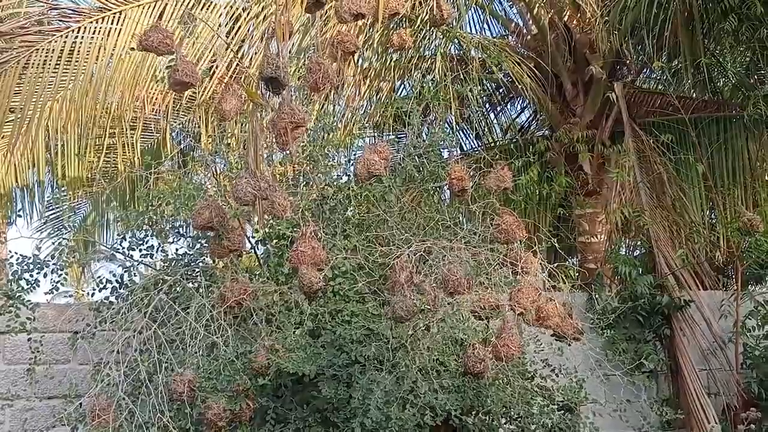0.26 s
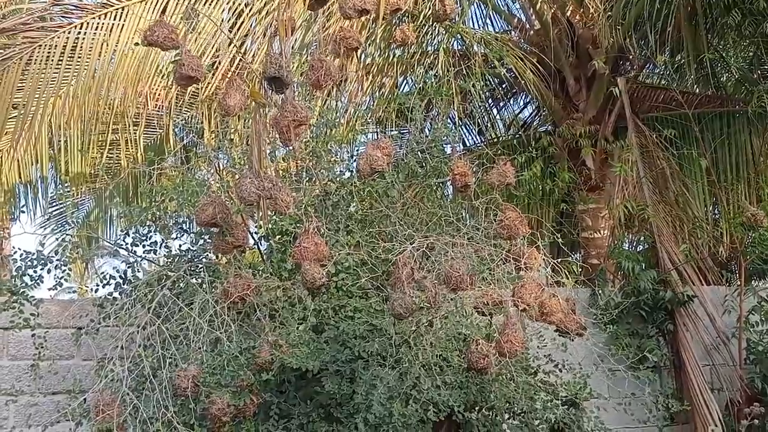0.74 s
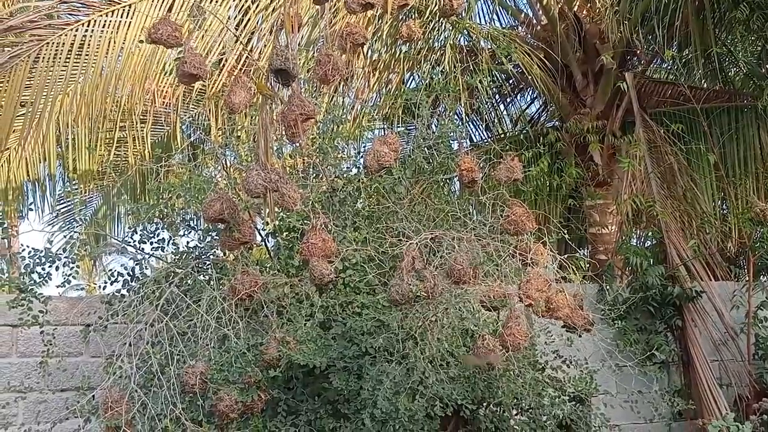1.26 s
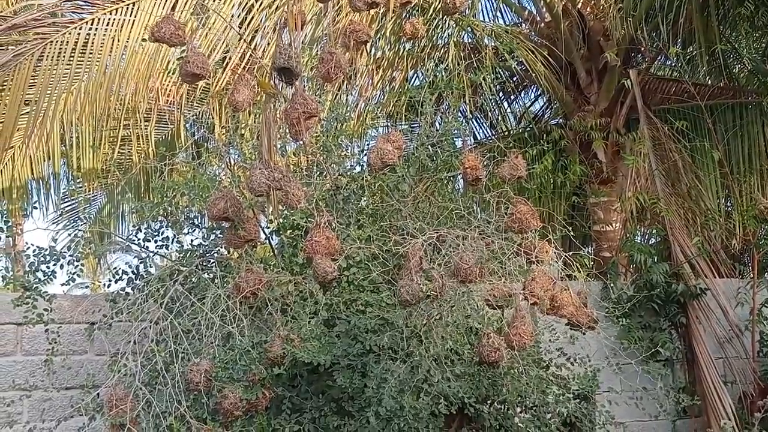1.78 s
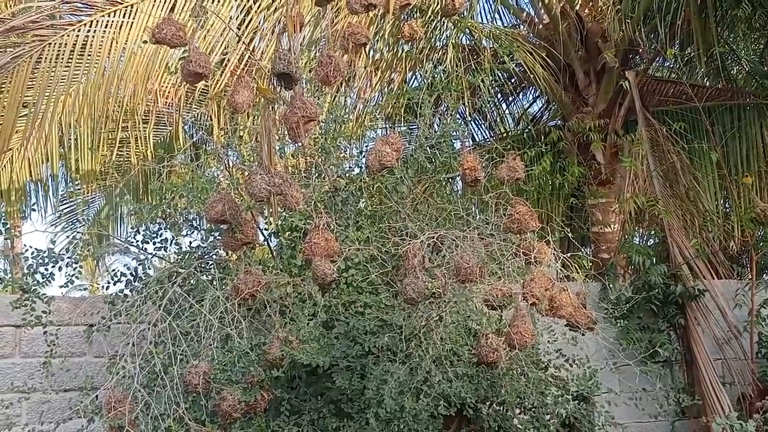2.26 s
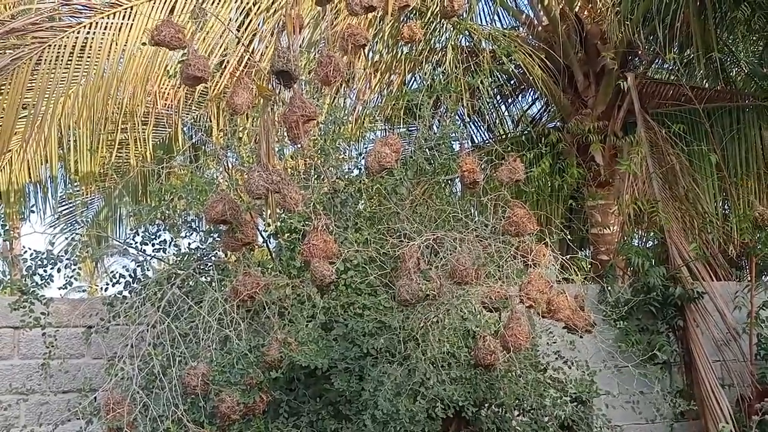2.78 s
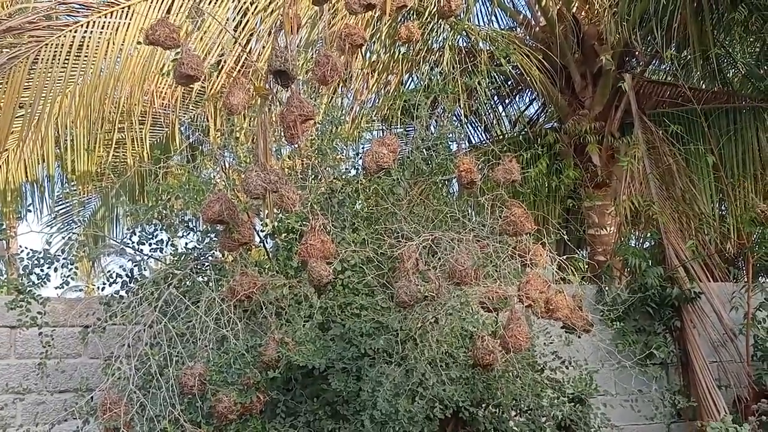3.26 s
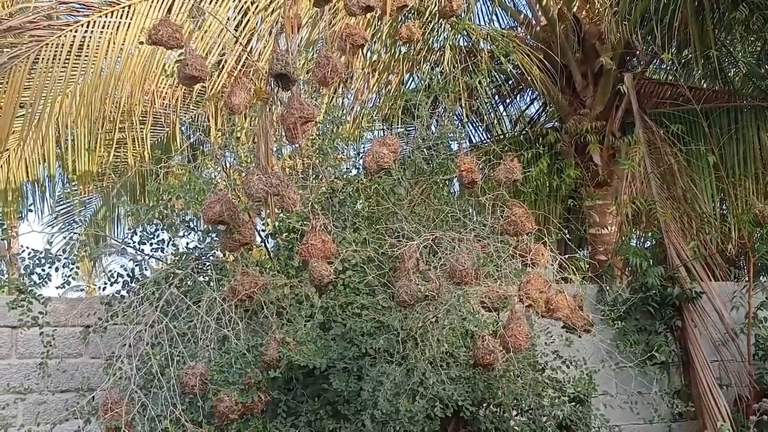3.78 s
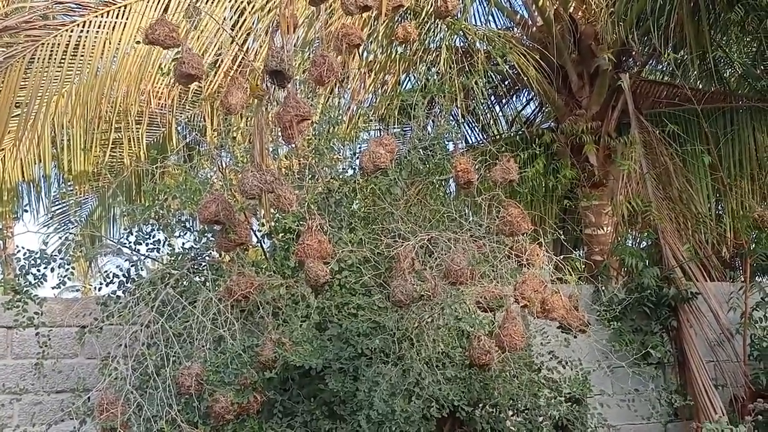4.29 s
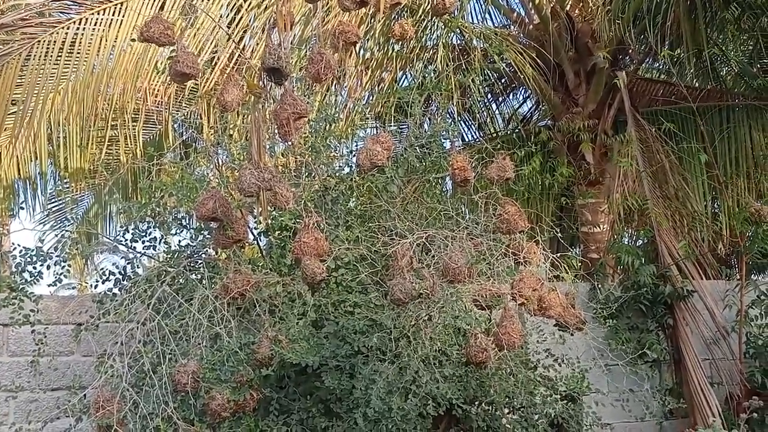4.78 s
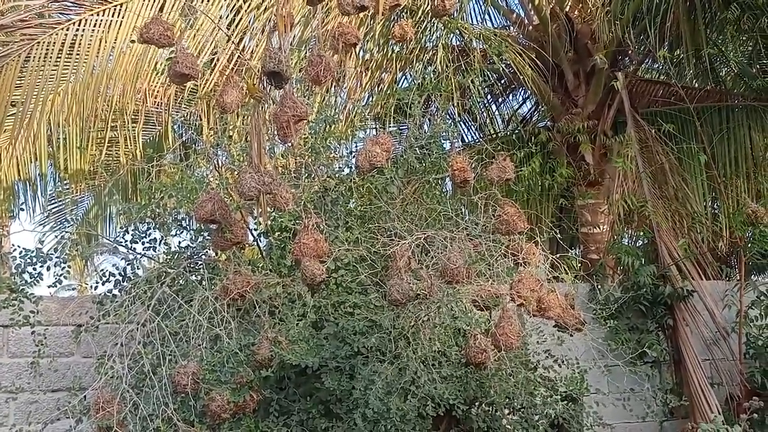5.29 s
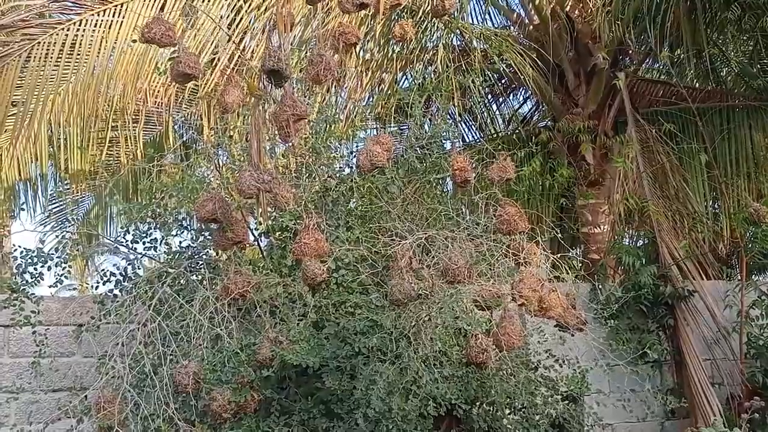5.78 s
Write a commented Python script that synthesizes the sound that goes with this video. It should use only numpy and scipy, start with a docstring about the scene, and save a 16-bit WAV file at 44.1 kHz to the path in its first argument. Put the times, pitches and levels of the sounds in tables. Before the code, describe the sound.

A colony of weaver birds in a garden tree, heard by a single outdoor microphone, identical in both channels. A dove coos softly at first among thin peeps and nasal squeals; then comes an even, rapid, harsh chatter while the distant colony swells. Piercing descending chirps, long grainy wheezes and clustered buzzes follow. Crisp clicks gather into a quick series near the end, closing with tiny upward chirps and a coarse buzz. Soft leaf hiss and low traffic hum remain underneath.

```python
"""Leaf hiss over a distant traffic hum is heard first, with a faint buzz; then a colony of weavers calls in a tree.
The hum, the hiss and the far colony are filtered noise; a dove coos and a mewing call arches once, as gliding tones.
Tongue clicks are decaying noise, whistles are gliding tones, and squeals are syrinx overtones weighted by the throat.
Buzzes and wheezes are noisy bands gated by syrinx pulses; a run of chatter is made of short hoarse overtone bursts.
Leaves and a wall add a short diffuse tail to the birds."""
import sys
import numpy as np
from scipy import signal
from scipy.fft import rfft, irfft
from scipy.io import wavfile
from scipy.ndimage import uniform_filter1d

SR = 44100
rng = np.random.default_rng(int(sys.argv[2]) if len(sys.argv) > 2 else 0)


def pcm_store(signal):
    """Save signal as 16-bit PCM."""
    levels = np.round(np.clip(np.atleast_2d(signal), -1, 1) * 32767)
    wavfile.write(sys.argv[1], SR, levels.astype(np.int16).T)


def invert_db(x):
    """Field ratio 10**(x/20) for x, a level in decibels (scalar or array-like)."""
    u = np.asarray(x, float) / 20
    return 10 ** u


N = 266364
TIME = np.arange(N) / SR
CUTOFF_HZ = 15750   # top of the audible band in this scene


def rms_one(x):
    """Normalisation to unit root-mean-square."""
    return x / np.sqrt(np.mean(np.abs(x) ** 2) + 1e-20)


def at_hz(points, hz):
    """Interpolation of a spectrum along a logarithmic frequency axis."""
    return np.interp(np.log(hz + 1), np.log(np.array(points)[:, 0]), np.array(points)[:, 1])


def coloured(x, spectrum):
    """Linear filtering: a gain of rms 1 over frequency shapes white noise and keeps its power."""
    gain = invert_db(at_hz(spectrum, np.fft.rfftfreq(len(x), 1 / SR)))
    return irfft(rfft(x) * rms_one(gain), len(x))


def wobble(size, width_hz):
    """Random modulation: complex low-pass noise, rms 1, spreads a tone to a band of this width with steep skirts."""
    settle = 600   # samples dropped while the filter starts
    white = rng.standard_normal(size + settle) + 1j * rng.standard_normal(size + settle)
    lowpass = signal.butter(3, width_hz / 2, fs=SR, output="sos")
    return rms_one(signal.sosfilt(lowpass, white)[settle:])


def note(rows, fade_s=0.0065):
    """Piecewise-linear contours: the sample span of a note, its linear fades and its columns in time."""
    s, *columns = np.transpose(rows)
    s = np.maximum.accumulate(s)
    span = slice(max(round(s[0] * SR), 0), min(round(s[-1] * SR), N))
    t = TIME[span]
    fade = np.clip(np.minimum(t - s[0], s[-1] - t) / fade_s, 0, 1)
    return span, fade, [np.interp(t, s, c) for c in columns]


def turns(hz):
    """Phase is the integral of frequency: a complex tone that follows a pitch contour."""
    return np.exp(2j * np.pi * np.cumsum(hz) / SR)


# spectrum of the traffic hum: [f/Hz, relative level per Hz/dB]
TRAFFIC_SPECTRUM = [(13, -63), (22, -31), (86, 1.5), (168, -6), (450, -11), (580, -9.5), (990, -120)]
TRAFFIC_DB = -62.5


def traffic_hum():
    """Low-frequency filtered noise whose level drifts slowly."""
    drift_db = 1.5 * wobble(N, 5.).real
    return invert_db(TRAFFIC_DB + drift_db) * coloured(rng.standard_normal(N), TRAFFIC_SPECTRUM)


# faint tones of fixed pitch: [f/Hz, level/dB]
STEADY_TONES = [(1670, -84), (14150, -91)]


def steady_tones():
    """Narrow-band modulation of sinusoids: each tone keeps its pitch while it wavers."""
    tones = np.zeros(N)
    for hz, level_db in STEADY_TONES:
        wavering = turns(np.full(N, hz)) * (1 + .5 * wobble(N, 7.7))
        tones += invert_db(level_db) * wavering.real
    return tones


# spectrum of the leaf hiss: [f/Hz, relative level per Hz/dB]
LEAF_SPECTRUM = [(150, -65), (250, -17), (509, 9.5), (1060, 7.5), (2470, 5.5), (4690, -3), (6990, -50),
                 (8610, -16), (9550, -21), (10800, -101), (15800, 4)]
LEAF_DB = -63.5


def leaf_hiss():
    """Broadband filtered noise with a slow fluctuation in level."""
    drift_db = 1.03 * wobble(N, 5.7).real
    return invert_db(LEAF_DB + drift_db) * coloured(rng.standard_normal(N), LEAF_SPECTRUM)


# level contour of the far birds: [t/s, level/dB]
CHORUS_LEVEL = [(0, -65), (.95, -66), (1.3, -59), (1.6, -53), (2.8, -54), (4.5, -56), (5.6, -60),
                (6.04, -60)]
# spectrum of the far birds, also of the air noise beside the buzzes: [f/Hz, relative level per Hz/dB]
WASH_SPECTRUM = [(880, -44), (1500, -38.5), (2530, -8.5), (5040, 8), (6970, 3), (8490, 4), (12100, -10),
                 (15800, -9)]


def far_colony():
    """Superposition of many far voices, rendered as one flickering band of noise."""
    flicker_db = 2.5 * wobble(N, 16.).real
    level = invert_db(np.interp(TIME, *np.transpose(CHORUS_LEVEL)) + flicker_db)
    return level * coloured(rng.standard_normal(N), WASH_SPECTRUM)


# dove notes: [t/s, length/s, early f/Hz, last f/Hz, level at the middle/dB]
COOS = [(0.222, .065, 580, 588, -45.5), (0.263, 0.092, 735, 553, -44.5), (.33, 0.162, 553, 481, -51.5),
        (0.487, 0.24, 614, 572, -52), (0.847, .42, 598.7, 551, -55.5), (1.542, 0.12, 628, 501, -53.5)]
COO_SCOOP, COO_SCOOP_S = 0.16, .018   # starts flat by this share, closes in with this time constant
COO_FALL_DB = 6.5   # over the whole note


def dove():
    """Frequency modulation of a nearly pure tone: it scoops up to pitch, then drifts to its last pitch and fades."""
    out = np.zeros(N)
    for start, length, early_hz, last_hz, level_db in COOS:
        span, fade, (u,) = note([(start, 0), (start + length, 1)], fade_s=0.024)
        scoop = 1 - COO_SCOOP * np.exp(-u * length / COO_SCOOP_S)
        hz = (early_hz + (last_hz - early_hz) * u ** 1.7) * scoop
        tone = turns(hz) * (1 + 0.094 * wobble(len(hz), 72.0))
        out[span] += fade * invert_db(level_db - COO_FALL_DB * (u - .5)) * tone.real
    return out


# contour of the mewing call: [t/s, fundamental f/Hz, relative level/dB]
MEW_CONTOUR = [(2.0, 535.8, -71), (2.092, 709, -60), (2.268, 751, -59.5), (2.3, 715, -60.5),
               (2.384, 733, -63), (2.436, 704, -62), (2.486, 666, -68), (2.534, 661, -67), (2.59, 526, -84)]
# partials of the mewing call from the fundamental up: [relative level/dB]
MEW_PARTIALS_DB = [2, -4, -6.5, -5.5, -3, 2.5, -21]


def mew():
    """Harmonic synthesis: partials at whole multiples share one arched, wavering fundamental."""
    out = np.zeros(N)
    span, fade, (hz, level_db) = note(MEW_CONTOUR, fade_s=0.0074)
    hz = hz * (1 + .018 * wobble(len(hz), 30.).real)
    for k, partial_db in enumerate(MEW_PARTIALS_DB, start=1):
        tone = turns(k * hz) * (1 + 0.33 * wobble(len(hz), 79.0))
        out[span] += fade * invert_db(level_db + partial_db + 3.5) * tone.real
    return out


# tongue clicks: [t/s, relative level/dB]
CLICKS = [(3.8702, -42), (4.09, -37), (4.5975, -32.5), (4.7882, -30), (4.8607, -28), (4.935, -30),
          (5.0071, -28.5), (5.0852, -31.5), (5.1645, -30), (5.235, -30.5), (5.2824, -29), (5.3306, -29.5),
          (5.3796, -29.5)]
# spectrum of a click: [f/Hz, relative level per Hz/dB]
CLICK_SPECTRUM = [(410, -73), (700, -19), (1970, -15), (2730, -12), (5640, -11.5), (8320, 2.5),
                  (10100, -10), (15500, -50)]


def clicks():
    """Exponential decay of an impulsive noise: a crack of a few ms with a weaker, slower tail."""
    shape = np.zeros(N)
    for start, level_db in CLICKS:
        t = np.maximum(TIME - start, 0)
        decay = np.exp(-t / 0.0055) + 0.39 * np.exp(-t / 0.022)
        shape += (t > 0) * invert_db(level_db - 13.0) * decay
    return coloured(shape * rng.standard_normal(N), CLICK_SPECTRUM)


# whistles: [t/s, length/s, first f/Hz, last f/Hz, level/dB, bend: over 1 moves early, under 1 late]
WHISTLES = [(0.24, 0.1, 2600, 2830, -62, 1.9), (0.277, 0.021, 4280, 4000, -36.5, 0.66),
            (0.279, 0.016, 6130, 5770, -41, 1), (4.087, 0.011, 5550, 7000, -36, 1.4),
            (0.971, 0.042, 5900, 3200, -38.5, 0.68), (1.073, 0.028, 5840, 4950, -34.5, 2.2),
            (1.078, 0.045, 4400, 4050, -45, 3), (1.35, 0.036, 5530, 3950, -35, .45),
            (1.368, 0.052, 3850, 3590, -43, 1.5), (1.501, 0.043, 2320, 2150, -54.5, 1.2),
            (2.59, .06, 5480, 4750, -28, 0.99), (2.708, 0.039, 4400, 3600, -33, 1.44),
            (2.829, 0.045, 4850, 4560, -40, 1.5), (2.882, 0.027, 9640, 9300, -39.5, 1.6),
            (2.913, 0.022, 9800, 8400, -47, 1.8), (3.347, 0.03, 9400, 5760, -41, 1.1),
            (3.526, 0.012, 4300, 3600, -31.5, 1.14), (3.533, 0.065, 5010, 3750, -30, 1.45),
            (4.354, 0.036, 2420, 2460, -48, 1.1), (4.354, 0.042, 2850, 2714, -40, 1.3),
            (4.439, 0.028, 6000, 4760, -37, 0.87), (4.904, 0.068, 2620, 2575, -54, 0.67),
            (5.355, 0.06, 2950, 2840, -66, 1.5), (4.433, 0.036, 4220, 3110, -42, 1.17),
            (4.457, 0.051, 4410, 3850, -27, 1.12), (4.552, 0.019, 6500, 5150, -43, 0.61),
            (5.52, 0.0094, 4750, 8000, -27.5, 2.06), (5.545, 0.0087, 5520, 7970, -32, 2.4),
            (5.564, 0.0196, 4900, 5420, -35.5, 1.5), (5.628, .06, 3070, 3040, -59.5, 1.1),
            (5.656, 0.013, 4856, 6030, -40.5, 2.9)]
# peep of a far bird: [length/s, first f/Hz, last f/Hz, level/dB, bend]
PEEP = (.031, 2440, 2230, -59, 1.2)
PEEP_S, PEEP_GAP_S = .511, .097   # first peep, spacing of the five
OCTAVE_DB = -16.5   # octave overtone of a whistle


def whistles():
    """Frequency glide of a nearly pure tone under a rounded envelope; squaring it yields the octave."""
    out = np.zeros(N)
    peeps = [(PEEP_S + k * PEEP_GAP_S, *PEEP) for k in range(5)]
    for start, length, from_hz, to_hz, level_db, bend in WHISTLES + peeps:
        at = round(start * SR)
        u = np.linspace(0, 1, round(length * SR))
        hz = to_hz + (from_hz - to_hz) * (1 - u) ** bend
        tone = turns(hz) * (0.64 + 0.37 * wobble(len(u), 770.0))
        envelope = np.abs(np.sin(np.pi * u)) ** 0.4
        out[at:at + len(u)] += invert_db(level_db) * envelope * (tone + invert_db(OCTAVE_DB) * tone ** 2).real
    return out


# squeals: [t/s, length/s, first f/Hz, middle f/Hz, last f/Hz, share of the note before the middle,
# level before the throat/dB]
SQUEALS = [(.284, .075, 2060, 1429, 1280, 0.28, -37), (.385, .055, 1462, 1300, 1192, .45, -42),
           (0.7, .11, 1950, 1352, 1223, .38, -53), (1.158, 0.11, 1730, 1485, 1292, .52, -33),
           (1.393, 0.11, 1296, 1417, 1253, .45, -30.5), (2.583, 0.05, 1341, 1295, 1200, .45, -58),
           (3.261, 0.055, 1670, 1488, 1330, .45, -39.5), (3.913, 0.072, 1750, 1447, 1320, .45, -46)]
# throat that colours the squeals: [f/Hz, gain/dB]
THROAT = [(1200, -36), (2800, -21), (3400, -12), (4000, 0), (5500, -4), (7000, -16), (8400, -10),
          (10000, -17), (11500, -30), (16000, -45)]
SQUEAL_ROUGH, SQUEAL_FADE_S = 0.093, 0.01   # roughness 0-1 of the second harmonic, fade in and out
SQUEAL_FLICKER_DB = 3   # scale of each harmonic's random level


def squeals():
    """Source and filter: syrinx harmonics on a smoothly bending pitch are weighted by the throat."""
    out = np.zeros(N)
    for start, length, first_hz, middle_hz, last_hz, share, level_db in SQUEALS:
        span, fade, (u,) = note([(start, 0), (start + length, 1)], fade_s=SQUEAL_FADE_S)
        u = 2 * u ** (np.log(.5) / np.log(share)) - 1     # -1 first, 0 middle, 1 last
        curve_hz = (first_hz + last_hz) / 2 - middle_hz
        hz = middle_hz + u * (last_hz - first_hz) / 2 + u ** 2 * curve_hz
        stack = 0
        for k in range(1, 11):
            rough = np.clip(SQUEAL_ROUGH * k / 2, 0, 1)     # high harmonics are rougher
            gain = invert_db(at_hz(THROAT, k * hz) + SQUEAL_FLICKER_DB * wobble(len(hz), 44.0).real)
            gain = gain * (k * hz < SR / 2.5)
            stack = stack + gain * turns(k * hz) * (1 - rough + rough * wobble(len(hz), 640.0))
        out[span] += fade * invert_db(level_db) * stack.real
    return out


# buzzes: [t/s, length/s, centre f/Hz, level/dB, bandwidth/Hz]
BUZZES = [(0, .14, 4590, -54, 2470), (0.319, 0.068, 4670, -41.5, 2470), (0.405, .06, 4580, -43.5, 2040),
          (0.586, 0.025, 7500, -53, 5100), (0.753, 0.057, 3780, -53, 1170),
          (0.99, 0.021, 4260, -40.5, 2180), (1.097, 0.063, 6100, -35.5, 1995),
          (1.237, 0.021, 2460, -49, 1840), (1.362, 0.035, 5490, -33.5, 1480),
          (1.496, 0.085, 5970, -38.5, 3040), (2.601, 0.062, 5100, -35.5, 600),
          (2.726, 0.049, 5160, -37, 1500), (2.828, 0.03, 5800, -42.5, 3100), (2.88, 0.052, 4986, -42, 2750),
          (3.012, 0.12, 7200, -43.5, 1600), (3.145, .12, 8900, -42.5, 1200),
          (3.29, 0.061, 4740, -42.5, 2187), (3.355, 0.043, 8000, -44.5, 1490),
          (3.385, 0.058, 5020, -44, 600), (3.522, .14, 8470, -46.5, 800), (3.568, 0.04, 5450, -44, 1510),
          (3.617, .28, 6100, -42.5, 892), (3.626, 0.29, 5000, -50, 505), (3.75, 0.16, 1750, -66, 583),
          (3.957, 0.045, 5960, -41, 1870), (3.995, 0.069, 4063, -40, 1110), (4.098, 0.06, 3810, -43, 656),
          (4.105, 0.051, 4950, -39.5, 856), (4.078, 0.1, 6300, -51, 940), (4.176, 0.092, 6090, -36.5, 1250),
          (4.254, 0.0615, 5180, -42, 800), (4.261, .11, 6130, -38, 1480), (4.264, 0.15, 9000, -51, 2200),
          (4.419, 0.033, 8330, -52, 1011), (4.484, 0.042, 5510, -39, 1220), (4.56, .07, 5320, -47.5, 1210),
          (4.597, 0.48, 6540, -57, 940), (4.922, 0.14, 5000, -57, 695), (5.15, 0.11, 5260, -58.5, 3005),
          (5.425, 0.24, 6530, -53, 5300), (5.519, 0.076, 6090, -42.5, 2660), (5.614, 0.24, 7160, -58, 3950),
          (5.79, 0.053, 8220, -43, 2020), (5.793, .32, 6170, -46.5, 1330), (5.8, 0.27, 3520, -59.5, 601),
          (5.86, 0.41, 7600, -49.5, 1506), (5.797, 0.32, 10500, -55.5, 1200),
          (0.192, 0.029, 6500, -59.5, 5100), (0.982, 0.035, 8870, -52.5, 2500),
          (1.095, 0.027, 9100, -43, 2500), (3.37, 0.55, 10670, -56, 1310), (4.0, .07, 10900, -59, 1510),
          (4.803, 0.58, 13500, -67, 4000), (3.527, 0.082, 2720, -59, 497), (3.052, 0.095, 12400, -55, 2500),
          (1.117, .16, 12050, -53, 4530), (4.206, 0.053, 10970, -56.5, 1994),
          (5.662, 0.094, 8770, -60.5, 1300), (5.428, 0.084, 2550, -61, 1557),
          (5.679, 0.41, 1453, -66, 1230)]
# long wheezes, one list each: [t/s, centre f/Hz, level/dB, relative level of the octave band/dB]
WHEEZES = [
    [(2.88, 4240, -70.5, 24), (2.95, 3990, -50.5, 10), (3.0, 4260, -46.5, 8.5), (3.06, 4365, -46, 0.5),
     (3.13, 4866, -38, 2.5), (3.2, 5120, -41, -15), (3.28, 5055, -60, 10)],
    [(3.38, 5790, -46, -30), (3.46, 6020, -33, -33), (3.54, 6930, -45.5, -20), (3.68, 7180, -36.5, -32),
     (3.79, 6930, -42, -33), (3.84, 6350, -35.5, -31), (3.89, 6220, -43, -25)],
    [(4.58, 8460, -57, -30), (4.72, 8280, -54.5, -30), (4.85, 8500, -51, -32), (5.0, 8430, -56.5, -30),
     (5.3, 8260, -55, -30), (5.57, 8390, -50.5, -30)],
]
# one value for each wheeze: [bandwidth/Hz]
WHEEZE_WIDTH_HZ = [520, 1300, 2300]
# syrinx pulsing: [t/s, mean pulse rate/Hz, sharpness of each pulse]
PULSING = [(0, 460, 2.5), (2.898, 328, 8.5), (3.38, 235, 1.3), (3.639, 150, 1.1), (3.901, 190, 2.6),
           (3.951, 280, 3), (4.18, 220, 0.94), (4.399, 290, 2.88), (5.4, 230, 2.2), (5.433, 80, 7),
           (5.501, 80, 5.7), (5.529, 250, 1.6), (5.79, 160, 11.2), (5.845, 160, 11), (5.878, 89, 6.5)]
# spectrum of the pulse snaps and of the chatter: [f/Hz, relative level per Hz/dB]
RASP_SPECTRUM = [(470, -53), (800, -31.5), (1130, -27), (1770, -24.5), (2030, -25.5), (3330, -22.5),
                 (3910, -11), (5890, -6.5), (8440, -16.5), (9320, -20.5), (15500, -29)]
BUZZ_SAG_HZ, BUZZ_OCTAVE_DB = 255.8, -15.5   # fall in pitch over a buzz; band an octave up
BUZZ_ATTACK, BUZZ_RELEASE = 0.24, 0.48   # shares of a buzz's length
BUZZ_BREATH_DB, WHEEZE_BREATH_DB = -13, -14   # snaps and air noise beside the band
PULSE_JITTER, PULSE_RING = .025, .9   # unevenness of the rate; ringing part beside the noisy part
PULSE_LEAK, OCTAVE_TOP_HZ = 0.28, 11500   # air that flows on between pulses; no octave band above this


def buzzes():
    """Amplitude modulation: uneven syrinx pulses gate noisy bands and air noise, and sharp pulses snap."""
    s, per_s, sharp = np.transpose(PULSING)
    per_s = np.interp(TIME, s, per_s) * (1 + PULSE_JITTER * wobble(N, 80.).real)
    cycle = np.cumsum(per_s) / SR
    since = cycle % 1 / per_s     # time since the last pulse
    sharp = np.maximum(np.interp(TIME, s, sharp), .1)
    strength = invert_db(0.5 * rng.standard_normal(N))[cycle.astype(int)]     # every pulse has its own force
    level_power = np.sqrt(2 * sharp / (1 - np.exp(-2 * sharp)))     # equal power at any sharpness
    gate = strength * np.exp(-sharp * (cycle % 1)) * level_power
    # a pulse opens in about a millisecond
    gate = PULSE_LEAK + uniform_filter1d(uniform_filter1d(gate, size=24), size=24)
    impulses = strength * np.diff(np.floor(cycle), prepend=0)
    snap = sharp * coloured(rms_one(impulses), RASP_SPECTRUM)
    breath = invert_db(-13) * snap + coloured(gate * rng.standard_normal(N), WASH_SPECTRUM)
    out = np.zeros(N)

    def add(span, envelope, hz, width_hz, octave_db, breath_db):
        """Harmonic bands: one noisy band with others at two and three times its frequency;
        a wheeze's octave may be the louder."""
        size = len(hz)
        afresh = np.exp(2j * np.pi * hz * since[span]) / turns(hz)     # each pulse starts the ring afresh
        afresh = signal.lfilter(np.ones(30) / 30, 1, afresh)     # smooths the restart
        band = turns(hz) * (PULSE_RING * afresh + wobble(size, width_hz))
        octave = invert_db(octave_db) * (2 * hz < OCTAVE_TOP_HZ) * turns(2 * hz) * wobble(size, 1030.0)
        third = invert_db(-21.0) * (3 * hz < CUTOFF_HZ) * turns(3 * hz) * wobble(size, 1200.0)
        voiced = gate[span] * (band + octave + third).real
        out[span] += envelope * (voiced + invert_db(breath_db) * breath[span])

    for start, length, centre_hz, level_db, width_hz in BUZZES:
        span, _, (u,) = note([(start, 0), (start + length, 1)])
        ramps = np.clip(np.minimum(u / BUZZ_ATTACK, (1 - u) / BUZZ_RELEASE), 0, 1)
        hz = centre_hz - BUZZ_SAG_HZ * (u - .5)
        add(span, invert_db(level_db) * np.sqrt(ramps), hz, width_hz, BUZZ_OCTAVE_DB, BUZZ_BREATH_DB)
    for rows, width_hz in zip(WHEEZES, WHEEZE_WIDTH_HZ):
        span, fade, (hz, level_db, octave_db) = note(rows)
        add(span, fade * invert_db(level_db), hz, width_hz, octave_db, WHEEZE_BREATH_DB)
    return out


# chatter bursts: [t/s at 4 ms before the peak, relative level/dB]
CHATTER = [(0.193, -48), (0.5916, -43), (1.534, -32), (1.5716, -24), (1.6322, -24.5), (1.6857, -23.5),
           (1.7461, -24), (1.8019, -23), (1.8635, -22), (1.923, -23.5), (1.9836, -21), (2.041, -21),
           (2.1006, -22), (2.16, -22.5), (2.221, -23), (2.281, -22.5), (2.3469, -23.5), (2.4095, -24.5),
           (2.4754, -23.5), (2.5322, -23.5), (2.686, -22)]
CHATTER_HZ = 1001   # mean fundamental at the peak
CHATTER_SWELL_S, CHATTER_DIE_S = 0.0064, .0036   # time constants


def chatter():
    """Harmonic synthesis in bursts: a hoarse stack bends up, with breath noise, as it swells and dies."""
    out = np.zeros(N)
    t = np.arange(-.03, .04, 1 / SR)     # 0 at the peak
    for start, level_db in CHATTER:
        detune = rng.standard_normal()     # every burst has its own pitch
        decay = np.exp(-np.where(t < 0, -t / CHATTER_SWELL_S, t / CHATTER_DIE_S))
        hz = CHATTER_HZ * (1 + 0.0301 * detune + 0.085 * np.tanh(t / 0.012))
        stack = sum(turns(k * hz) * (0.69 + wobble(len(t), 680.0)) for k in range(1, 15)).real
        hoarse = rms_one(stack) + .5 * rng.standard_normal(len(t))
        at = round((start + .004 + t[0]) * SR)
        out[at:at + len(t)] += invert_db(level_db - 11.5) * decay * hoarse
    return coloured(out, RASP_SPECTRUM)


TREE_T60_S, TREE_DB = .17, -4   # decay by 60 dB; tail beside the direct sound


def tree(x):
    """Diffuse reverberation: leaves and the wall scatter the sound into a short decaying tail."""
    t = TIME[:SR // 3]
    tail = rng.standard_normal(len(t)) * invert_db(-60 * t / TREE_T60_S) * (t > .002)
    return x + invert_db(TREE_DB) * signal.fftconvolve(x, tail / np.sqrt(np.sum(tail ** 2)))[:N]


def scene():
    """Superposition: all voices add at one microphone, alike in both channels."""
    background = traffic_hum() + steady_tones() + leaf_hiss() + far_colony()
    birds = dove() + mew() + clicks() + whistles() + squeals() + buzzes() + chatter()
    return np.tile(tree(birds) + background, (2, 1))


def top_cut(x):
    """Nothing passes above the cut-off."""
    return signal.sosfilt(signal.butter(12, 16460, fs=SR, output="sos"), x)


# resonances of the microphone port: [f/Hz, width at half the dB gain/Hz, gain/dB]
PORT = [(3650, 350, 5), (5100, 300, 5), (6400, 400, 4), (7100, 300, 3), (8350, 450, 5), (10700, 1000, 5),
        (12600, 1400, -5)]


def record(dry):
    """Resonance: the microphone port lifts several treble bands and dips one; the top is cut."""
    hz = np.fft.rfftfreq(N, 1 / SR)
    port_db = np.zeros(len(hz))
    for centre_hz, width_hz, peak_db in PORT:
        port_db += peak_db / (1 + ((hz - centre_hz) / (width_hz / 2)) ** 2)
    mix = irfft(rfft(dry) * invert_db(port_db) * (hz < CUTOFF_HZ), N)
    return top_cut(mix)


dry = scene()
out = record(dry)
pcm_store(out)
```